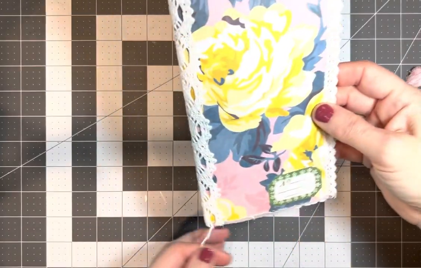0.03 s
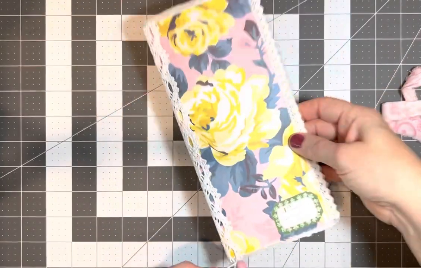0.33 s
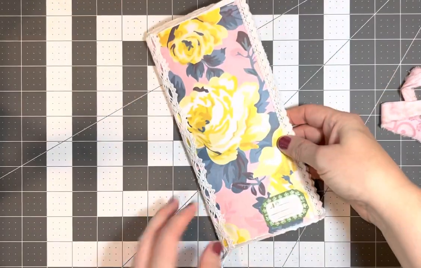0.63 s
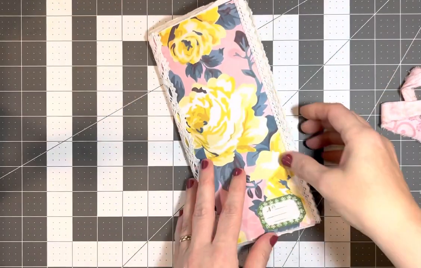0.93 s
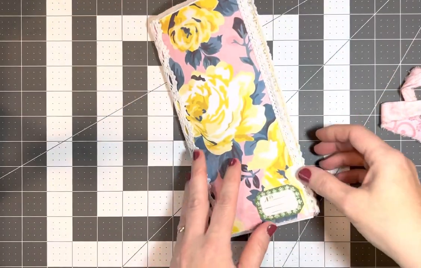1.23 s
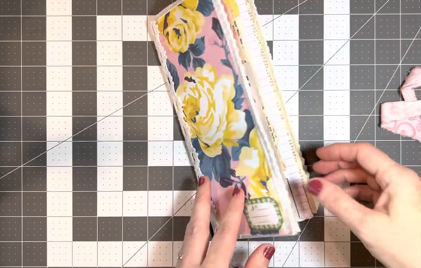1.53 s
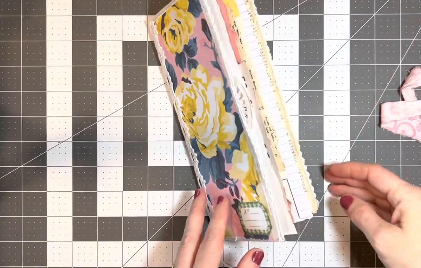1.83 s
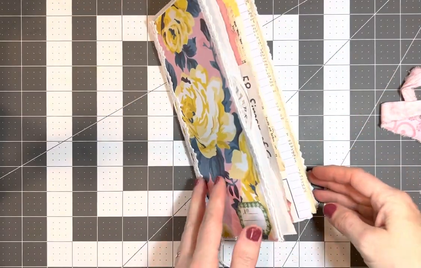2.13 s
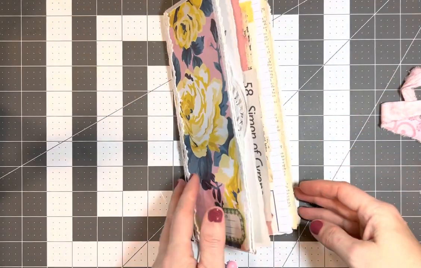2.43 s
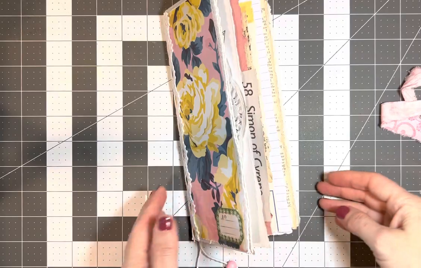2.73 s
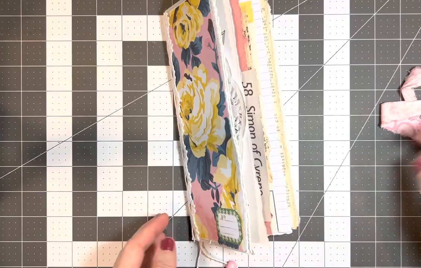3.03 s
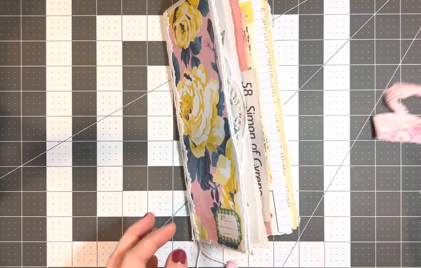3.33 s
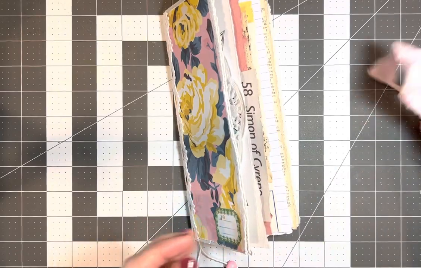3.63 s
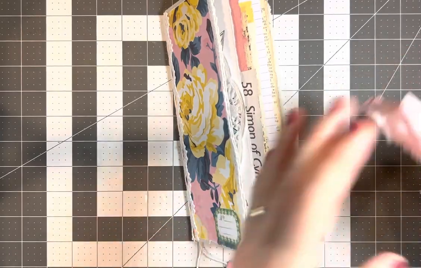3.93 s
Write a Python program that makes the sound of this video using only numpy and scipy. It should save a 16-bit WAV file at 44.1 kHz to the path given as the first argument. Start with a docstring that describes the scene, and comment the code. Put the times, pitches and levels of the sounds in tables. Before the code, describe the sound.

Sharp clack of a journal set down, then soft paper handling over a low hum.

```python
"""Ticks and a sharp clack over a low hum: a paper journal lands on a cutting mat, near a two-port
microphone in a small room. Each impact excites damped modes, which desk and room scatter. Fingers and
pages then rub with a soft friction hiss, and the cover falls open with a rustle and a puff of air.
Last, something is picked up from the mat with a few light ticks. Now and then the nudged desk thumps,
and ventilation rumbles throughout."""
import sys
import numpy as np
from scipy import signal
from scipy.fft import rfft, irfft
from scipy.io import wavfile
from scipy.ndimage import map_coordinates

SR = 44100
rng = np.random.default_rng(int(sys.argv[2]) if len(sys.argv) > 2 else 0)


def unload_wav(signal):
    """Save mono or channel-first audio to the path in sys.argv[1] as 16-bit WAV at rate SR, clipped to [-1, 1]."""
    wavfile.write(
        sys.argv[1],
        SR,
        np.round(np.clip(np.atleast_2d(signal).T, -1, 1) * 32767).astype(np.int16),
    )


N = 176400
TOP_HZ = 16500  # upper band edge

# contacts as the journal lands: t/s, level/dB, tilt/(dB per octave)
LANDING_CONTACTS = [(.4388, -16, -2.5), (.452, -24, -7), (.5207, -20.5, -9), (.5290, 4.5, 0.5),
                    (.6063, -4, -0.5), (.6305, -25, -7), (.6463, -13, -2.5), (.663, -23, -6.5)]
# normal modes of the journal: f/Hz, level/dB, T60/s
JOURNAL_MODES = [(333, -25.5, 0.07), (752, -37, 0.072), (1510, -29, 0.046), (2140, -17.5, 0.0089),
                 (2770, -15, 0.006), (4000, -7, 0.0054), (4600, -17.5, 0.005), (5730, -7, 0.0049),
                 (6570, -6.5, 0.0038), (7300, -14.5, 0.0056), (8900, -17.5, 0.0065), (9900, -17, 0.0058)]
def landing():
    """Impact excitation: the journal's hard parts strike the mat and ring at their natural frequencies."""
    return impacts(LANDING_CONTACTS, JOURNAL_MODES, edge_reflection=0.45, travel_s=0.00169)


# contacts as the small object is lifted: t/s, level/dB, tilt/(dB per octave)
PICKUP_CONTACTS = [(3.5105, -31.5, 1), (3.515, -32, -3), (3.5248, -18, 4), (3.530, -36, -1),
                   (3.5375, -27, 2), (3.5392, -26.5, -0.5), (3.587, -36, 1), (3.629, -40, 10)]
# normal modes of that object: f/Hz, level/dB, T60/s
PICKUP_MODES = [(3200, -0.5, 0.0063), (3730, -11, 0.01), (5430, -8.5, 0.0083), (6550, -11, 0.0059),
                (8300, -3.5, 0.0021), (10200, -12.5, 0.0034)]
def pickup():
    """Free vibration: a small object, lightly knocked, rings in high, quickly damped modes."""
    return impacts(PICKUP_CONTACTS, PICKUP_MODES, crack_db=-13, travel_s=0.00051)


# catches during a stroke: t/s, level/dB, tilt/(dB per octave)
CATCH_CONTACTS = [(.8293, -30, 3), (2.310, -33, 1)]
def catches():
    """Impulsive release: a fingertip or page edge catches and lets go with a broadband click."""
    return impacts(CATCH_CONTACTS, modes=[])


# spectrum of the contact transient: f/Hz, level/dB
CRACK_SPECTRUM = [(1000, -20.5), (2100, -2.5), (6000, 6), (10500, -7.5), (13000, -5), (16000, -10)]
# spectrum of the reflections from desk and room: f/Hz, level/dB
ECHO_SPECTRUM = [(200, -18), (850, 1.5), (1700, -7), (2800, 4), (3300, 2), (4400, 6.5), (5500, 4.5),
                 (6300, 1), (9500, -8), (12000, -19), (16000, -29)]
def impacts(contacts, modes, crack_db=-11, edge_reflection=0, travel_s=0):
    """Modal superposition: each contact is a crack plus damped modes, followed by reverberation."""
    size = SR // 2
    t, f = np.arange(size) / SR, np.arange(size // 2 + 1) * SR / size
    desk_t60_s, room_t60_s, build_up_s, crack_s = 0.026, 0.26, 0.0016, 0.00072
    echo_decay = undb(-31.5 - 60 * t / desk_t60_s) + undb(-42.5 - 60 * t / room_t60_s)
    echo_envelope = echo_decay * (1 - np.exp(-(t / build_up_s) ** 2))
    edge_comb = 1 - edge_reflection * np.exp(-2j * np.pi * f * 0.000569)  # inverted return from the edge
    # bending waves carry the treble first; travel_s is their travel time at 2 kHz
    dispersion = np.exp(-2j * np.pi * travel_s * np.sqrt(2000) * (2 * np.sqrt(f) - f / np.sqrt(TOP_HZ)))
    out = np.zeros((2, N))
    for at, db, tilt_db in contacts:
        vibration = undb(crack_db) * np.exp(-t / crack_s) * noise(CRACK_SPECTRUM, size=size)
        for hz, mode_db, t60 in modes:
            detuned_hz = hz * (1 + .01 * rng.standard_normal())
            envelope = undb(mode_db - 60 * t / t60) * (1 - np.exp(-2 * t * hz))
            vibration += envelope * np.sin(2 * np.pi * detuned_hz * t)
        direct = undb(-11.5) * rfft(vibration) * edge_comb * dispersion
        echo = rfft(echo_envelope * scattered(ECHO_SPECTRUM, side_gain=0.83, size=size))
        tilt = undb(tilt_db * np.log2(np.hypot(f, 1000) / 5000))
        tick = irfft((direct + echo) * tilt)[:, :-size // 4]
        add(out, undb(db) * tick, at)
    return out


# strokes of skin and paper: peak t/s, rise/s, fall/s, level/dB, resonance f/Hz, resonance gain/dB
STROKES = [(0.059, 0.035, 0.096, -77, 7500, 4), (.78, 0.47, 0.21, -64.5, 10100, 7),
           (1.02, 0.13, 0.19, -61.5, 6170, 5), (1.35, 0.15, 0.12, -70.5, 7000, -1),
           (2.3, 0.13, 0.2, -63.5, 6160, 6), (3.26, 0.035, 0.09, -63, 3150, 14),
           (3.33, 0.1, .14, -61, 7600, 7.5), (3.58, 0.089, 0.054, -64.5, 5770, 3)]
# spectrum of the sliding noise: f/Hz, level/dB
FRICTION_SPECTRUM = [(800, -13), (2000, 0.5), (3900, 1.5), (5000, 0), (6200, -0.5), (8500, -3.5),
                     (11000, -2.5), (12200, -13), (16000, -25)]
def rubs():
    """Sliding friction: each stroke hisses with its own resonance, which wanders as pressure shifts."""
    out = np.zeros((2, N))
    for at, rise, fall, db, hz, peak_db in STROKES:
        friction = undb(db) * swell(at, rise, fall) * fibres(snag_gain=1.3)
        out += friction * wander(scattered(FRICTION_SPECTRUM, peak_hz=hz, peak_db=peak_db))
    return out


def fibres(snag_gain, snags_per_s=45, release_s=.0012, flicker_db=0.5):
    """Stick-slip: paper fibres catch and slip, so friction flickers; now and then one snags harder."""
    snags = (rng.random(N) < snags_per_s / SR) * rng.uniform(0.45, 1, N)
    release = signal.lfilter([1], [1, -np.exp(-1 / (release_s * SR))], snags)
    flicker = undb(flicker_db * waver(per_s=600))
    return unit(flicker * (1 + snag_gain * release))


# spectrum of the fanning pages: f/Hz, level/dB
PAGE_SPECTRUM = [(150, -35), (400, 5), (800, -3), (1500, -12), (3000, -21), (5000, -22), (8300, -27),
                 (11000, -36), (14000, -45)]
def pages(at=1.68, rise_s=0.024, decay_s=0.056):
    """Friction between sheets: the pages fan open with a dull rustle that decays exponentially."""
    age = np.maximum(np.arange(N) / SR - at, 0)
    envelope = np.minimum(age / rise_s, 1) * np.exp(-np.maximum(age - rise_s, 0) / decay_s)
    return undb(-45) * envelope * fibres(snag_gain=0) * scattered(PAGE_SPECTRUM)


# spectrum of the air pushed by the cover: f/Hz, level/dB
PUFF_SPECTRUM = [(200, -29), (400, 2), (600, -8), (790, -1), (1100, -24), (3000, -50)]
def cover_flap():
    """Air displacement: the cover swings up and pushes out a soft, low puff."""
    return undb(-50) * swell(1.725, rise_s=0.018, fall_s=0.078) * scattered(PUFF_SPECTRUM)


# nudges to the desk: t/s, level/dB, f/Hz
DESK_BUMPS = [(0.649, -54, 74.5), (1.023, -35, 57.3), (3.108, -35.5, 56), (3.851, -37, 53)]
def desk_bumps(rise_s=0.024):
    """Damped oscillation: nudged by hands and journal, the desk answers with a few low cycles."""
    out, t = np.zeros((2, N)), np.arange(SR // 2) / SR
    envelope = t / rise_s * np.exp(1 - t / rise_s)
    for at, db, hz in DESK_BUMPS:
        add(out, undb(db) * envelope * np.sin(2 * np.pi * hz * t), at)
    return out


# spectrum of the ventilation, in phase at the two ports: f/Hz, level/dB
RUMBLE_MID = [(20, -27), (31, -15.5), (50, -1), (75, -3.5), (135, -7.5), (200, -14.5), (360, -15.5),
              (465, -24.5), (545, -21), (600, -26), (850, -26.5), (1800, -38), (2500, -41), (4300, -49.5),
              (5500, -54.5), (8000, -57), (9600, -60.5), (11000, -57), (12000, -71), (16000, -61)]
# spectrum of its antiphase part: f/Hz, level/dB
RUMBLE_SIDE = [(30, -33), (100, -16), (350, 1), (1150, -7), (1900, -19.5), (4000, -22), (6200, -38.5),
               (14000, -68)]
# hum tones: f/Hz, level/dB, modulation depth, modulation rate/Hz
HUM_TONES = [(56.5, -52, 0.47, 16), (166.8, -49, 0.5, 8)]
def room_tone():
    """Stationary noise: ventilation rumbles, with two hums randomly modulated in amplitude and phase."""
    t, hum = np.arange(N) / SR, np.zeros(N)
    for hz, db, depth, rate in HUM_TONES:
        modulation = 1 + depth * (waver(rate) + 1j * waver(rate))
        hum += undb(db) * unit(np.real(modulation * np.exp(2j * np.pi * hz * t)))
    return stereo(undb(-40.5) * noise(RUMBLE_MID) + hum, undb(-56.5) * noise(RUMBLE_SIDE))


def scattered(spectrum, side_gain=0.3, **shaping):
    """Diffuse field: noise arrives from many directions; the ports differ mainly below the treble."""
    lowpass = signal.butter(1, 2510, fs=SR, output="sos")
    side = signal.sosfilt(lowpass, noise(spectrum, **shaping))
    return stereo(noise(spectrum, **shaping), side_gain * side)


def noise(spectrum, peak_hz=1, peak_db=0, half_width_hz=500, size=N):
    """Spectral shaping: noise of rms 1 follows (f/Hz, level/dB) points, with an optional resonance."""
    f = np.maximum(np.arange(size // 2 + 1) * SR / size, 1)
    hz, db = np.array(spectrum, float).T
    colour_db = np.interp(np.log(f), np.log(hz), db)
    resonance_db = peak_db / (1 + ((f - peak_hz) / half_width_hz) ** 2)
    return unit(irfft(rfft(rng.standard_normal(size)) * undb(colour_db + resonance_db), size))


def wander(x, depth=.012):
    """Frequency modulation: as pressure shifts, the stroke's colour glides slightly up and down."""
    position = np.cumsum(1 + depth * waver(per_s=18))
    return np.array([map_coordinates(channel, [position], order=5, mode="mirror") for channel in x])


def waver(per_s):
    """Linear interpolation between random values."""
    return np.interp(np.arange(N) * per_s / SR, np.arange(N), rng.standard_normal(N))


def swell(peak_s, rise_s, fall_s):
    """Raised-cosine envelope around a moment."""
    t = np.arange(N) / SR - peak_s
    progress = np.clip(np.where(t < 0, t / rise_s, t / fall_s), -1, 1)
    return np.cos(np.pi / 2 * progress) ** 2


def undb(db):
    return 10 ** (np.asarray(db) / 20)


def unit(x):
    return x / np.sqrt(np.mean(x ** 2))


def stereo(mid, side):
    return np.array([mid + side, mid - side])


def add(out, x, at):
    start = int(at * SR)
    out[:, start:start + x.shape[-1]] += x[..., :N - start]


def scene():
    """Linear superposition: the sound pressures of all sources add."""
    return landing() + pickup() + catches() + rubs() + pages() + cover_flap() + desk_bumps() + room_tone()


# phase of the left port against the right: f/Hz, phase/rad
PORT_PHASE = [(0, 0), (2300, -.1), (4200, -.45), (4750, -1.7), (5250, -5.5), (5800, -6.25), (7400, -6.33),
              (11000, -8.3), (12200, -9.2), (16000, -9.65)]
def record(dry):
    """Interchannel phase shift: the two ports part in phase in the treble; a low-pass cuts the top."""
    f = np.arange(N // 2 + 1) * SR / N
    phase = np.interp(f, *np.array(PORT_PHASE).T)
    heard = irfft(rfft(dry) * np.exp(.5j * np.array([phase, -phase])), N)
    return signal.sosfilt(signal.ellip(8, .2, 70, TOP_HZ, fs=SR, output="sos"), heard)


dry = scene()
out = record(dry)
unload_wav(out)
```